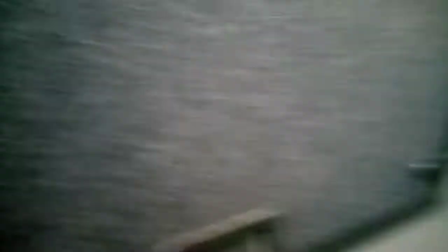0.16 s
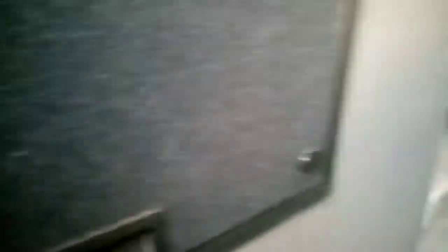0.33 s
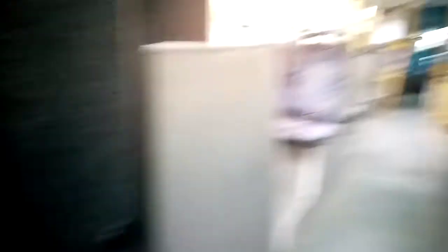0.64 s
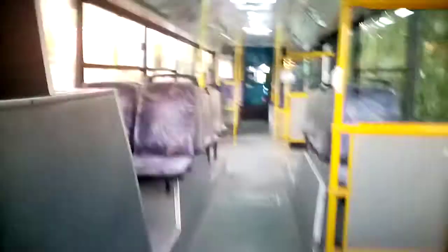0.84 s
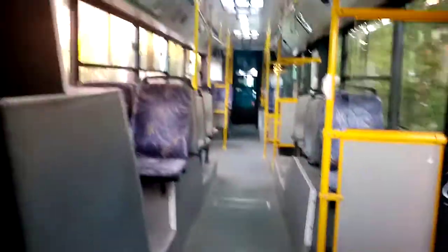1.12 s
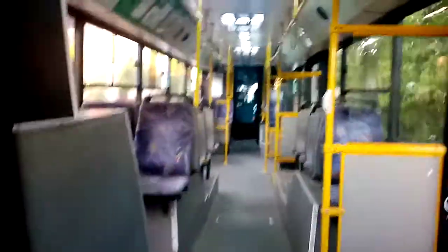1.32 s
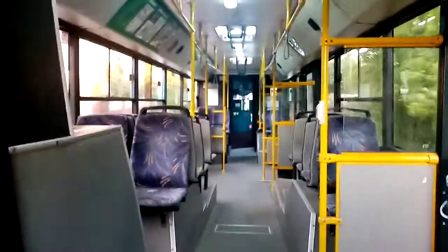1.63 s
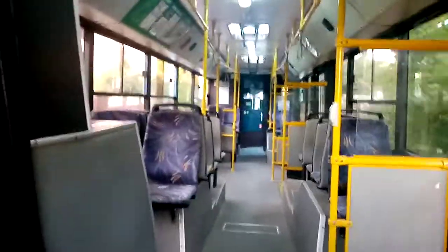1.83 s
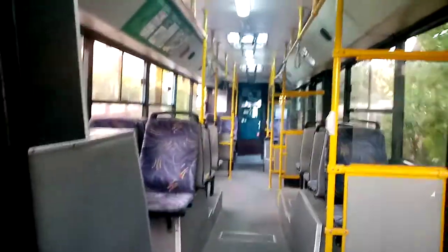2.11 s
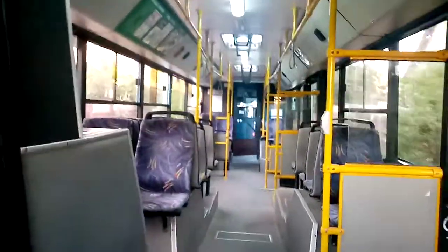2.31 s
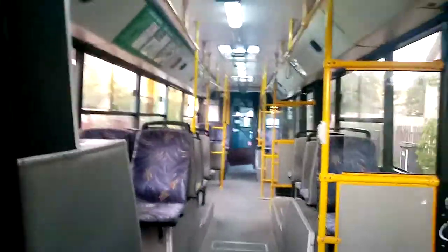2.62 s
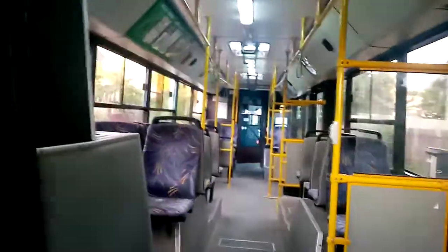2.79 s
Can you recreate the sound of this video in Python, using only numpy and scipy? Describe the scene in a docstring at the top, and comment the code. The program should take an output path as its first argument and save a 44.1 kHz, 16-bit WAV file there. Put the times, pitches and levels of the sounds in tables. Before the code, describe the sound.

A moving city bus engine hums continuously over a wavering driveline drone, cabin boom and broadband tyre roar. Handling swishes, small clicks, dull bumps and briefly singing panels mark the first 0.6 s. As the handheld microphone turns, airy noise swells near 1.1 s and fades by 1.5 s. The engine slows slightly and throbs more strongly; faint panel chatter and dry rattles continue to about 2.7 s, with soft road thuds near 2.6-2.8 s.

```python
"""Inside a moving city bus, heard from the back seats.
From the start an engine hums and throbs, slowing slightly, over the surging tones of the drive shaft; the
cabin booms, panels ring, tyres roar and air hisses, with swishes and clicks of a hand-held device and road bumps.
The device turns from wall to aisle, rebalancing tones and resonances; during the turn a rush of air swells and
dies away; panel chatter and short rattles begin during it and go on after. Shafts are sines, the rest mostly noise."""
import sys
import numpy as np
from scipy import signal
from scipy.fft import rfft, irfft
from scipy.io import wavfile
from scipy.ndimage import uniform_filter1d

SR = 44100
rng = np.random.default_rng(int(sys.argv[2]) if len(sys.argv) > 2 else 0)


def wav_out(sig):
    """Save sig, one row per channel (or a flat mono array), as 16-bit PCM at SR to the path in sys.argv[1]."""
    wavfile.write(sys.argv[1], SR, np.round(np.clip(np.atleast_2d(sig).T, -1, 1) * 32767).astype(np.int16))


N = 130095
T, HZ = np.arange(N) / SR, np.fft.rfftfreq(N, 1 / SR)

# Crankshaft speed: t/s, speed/(turns per s)
CRANK_SPEED = [(0, 35.15), (.3, 35.0), (.65, 35.35), (1.05, 34.72), (1.35, 34.4), (1.6, 33.95),
               (1.9, 33.65), (2.25, 33.65), (2.95, 33.85)]
# Drive shaft speed: t/s, speed/(turns per s)
SHAFT_SPEED = [(0, 49.25), (.8, 49.33), (1.5, 49.58), (2.2, 49.83), (2.95, 49.95)]
# Multiples of crank speed in the engine hum: order/1
CRANK_ORDERS = [12, 21, 24, 30]
# Engine hum, one row per order: level facing wall/dB, level facing aisle/dB
CRANK_FACING = [(-33, -33.5), (-47, -39.5), (-44.5, -41.5), (-42.5, -44)]
# Multiples of shaft speed in the shaft hum: order/1
SHAFT_ORDERS = [1, 2, 3, 10, 11, 12, 24]
# Shaft hum, one row per order: level facing wall/dB, level facing aisle/dB
SHAFT_FACING = [(-28.5, -52), (-32.5, -51), (-36.5, -42.5), (-36, -34), (-37, -35.5), (-46.5, -52.5),
                (-38, -65)]
# Engine throb: t/s, level/dB
THROB_LEVEL = [(0, -32), (1.05, -33), (1.2, -26.5), (1.6, -23.5), (2.95, -22.7)]
# Drive shaft drone: t/s, level/dB
DRONE_LEVEL = [(0, -33.5), (.12, -24), (.3, -25), (.45, -26), (.7, -29.5), (.95, -23), (1.06, -26.5),
               (1.2, -23.5), (1.35, -28.5), (1.55, -21), (1.7, -28), (1.82, -23.5), (2.02, -23),
               (2.17, -22.5), (2.4, -24), (2.52, -25), (2.8, -20), (2.95, -28)]
# Passing engine tones: multiple of crank speed/1
SWELL_ORDERS = [24, 24, 19, 19, 12]
# Passing engine tones, one row per order: peak t/s, mean level/dB, half length/s
SWELLS = [(.2, -34, .15), (.55, -39, .15), (.62, -32.5, .28), (1.08, -26.5, .17), (1.5, -24.5, .2)]
# Cabin boom before BOOM_GAIN_DB: t/s, level/dB
BOOM_LEVEL = [(0, -33), (.04, -23), (.12, -30.5), (.19, -30), (.24, -37), (.44, -26), (.76, -39),
              (.81, -28), (1.01, -33), (1.21, -27.5), (1.46, -39.5), (1.54, -24.5), (1.73, -35),
              (1.83, -23), (1.98, -30.5), (2.09, -23), (2.2, -25), (2.3, -39), (2.45, -23), (2.7, -33),
              (2.86, -26), (2.93, -28)]
# Cabin and panel resonances: f/Hz, width/Hz, level facing wall/dB, level facing aisle/dB
RESONANCES = [(56, 20, -31, -28.5), (136, 42, -29, -37.5), (174, 220, -26, -48.5), (188, 15, -35.5, -33.5),
              (1118, 12, -54, -46), (1767, 20, -68, -49.5), (3200, 230, -59, -41.5), (3955, 240, -66, -39)]
# Briefly singing panels: start/s, end/s, f/Hz, width/Hz, level/dB, fade/s
SINGS = [(-.1, .22, 1181, 14, -31, .07), (-.1, .24, 1222, 45, -35, .05), (.12, .25, 2505, 30, -39.5, .15),
         (-.1, .48, 189, 8, -25.5, .15), (.35, .75, 1109, 6, -40, .15)]
# Tyre and road spectrum before ROAD_LEVEL: f/Hz, density/(dB per Hz)
ROAD_SPECTRUM = [(20, -70), (32, -70.5), (45, -45), (65, -46.5), (110, -51), (160, -51.5), (250, -51),
                 (350, -50.5), (500, -50.5), (700, -57), (1100, -59), (1600, -66.5), (2200, -66.5),
                 (3400, -67), (4800, -69.5), (6300, -71), (7000, -79), (8200, -104), (16000, -116)]
# Road gain: t/s, level/dB
ROAD_LEVEL = [(0, -2.5), (.6, 2), (1.3, 1), (1.7, 0.5), (2.1, 1.5), (2.3, 0.5), (2.47, 1), (2.95, 0.5)]
# Air spectrum before RUSH_LEVEL: f/Hz, density/(dB per Hz)
RUSH_SPECTRUM = [(200, -42), (450, -59), (800, -55), (1300, -57), (2300, -56.5), (3500, -57.5),
                 (4800, -61.5), (6300, -63.5), (7100, -76), (8200, -92.5), (16000, -115)]
# Air gain: t/s, level/dB
RUSH_LEVEL = [(0, -5), (.3, -8.5), (.47, -10), (.65, -6.5), (.83, -8.5), (.885, -1.5), (.97, -7),
              (1.04, -3), (1.08, 1), (1.12, -2.5), (1.17, -5.5), (1.27, -8.5), (1.37, -14.5), (1.48, -29),
              (1.53, -6), (1.62, -22.5), (2.95, -20)]
# Hand swish spectrum before SWISH_LEVEL: f/Hz, density/(dB per Hz)
SWISH_SPECTRUM = [(2000, -81.5), (6500, -62), (8200, -79), (11000, -84), (13500, -87.5), (16000, -83)]
# Swish gain: t/s, level/dB
SWISH_LEVEL = [(0, -5.5), (.08, -20), (.2, -8), (.25, -14), (.34, -5), (.42, -16), (.54, -12), (.565, 1.5),
               (.63, -17), (.72, -2.5), (.8, -6), (.95, -7.5), (1.1, -10.5), (1.2, -22), (1.4, -45),
               (2.95, -41.5)]
# Likeness of noise at the two microphones: f/Hz, likeness/(0-1)
LIKENESS = [(60, 0.94), (300, 0.95), (520, 0.91), (700, 0), (1200, 0.14), (3000, 0.13), (8000, 0)]
# Handling clicks: t/s, gain/dB
CLICKS = [(0.1623, -32.5), (0.293, -33.5), (.554, -49)]
# Click spectrum shape: f/Hz, gain/dB
CLICK_COLOUR = [(1000, -9), (5000, 10.5), (7000, 2), (9000, -12), (13000, 2), (16000, -7)]
# Road bumps: t/s, gain/dB, f/Hz
BUMPS = [(.012, -20, 95), (.166, -14, 70), (.335, -24, 50), (.58, -23, 50), (2.58, -19.5, 57),
         (2.65, -21, 57), (2.79, -21, 57)]
# Panel chatter bursts: peak t/s, level/dB, half length/s
SHAKES = [(.672, -37, .018), (1.085, -31, .025), (1.26, -35, .035), (1.545, -37, .035), (2.42, -39, .04),
          (2.53, -39, .03)]
# Loose panel modes: f/Hz, width/Hz, gain/dB
PANEL_MODES = [(1480, 130, -2), (1900, 220, 3.5), (2380, 230, 2), (3100, 350, -6.5), (3930, 450, -8)]
# Rattles: t/s, gain/dB, decay/s, treble tilt at RATTLE_TOP_HZ/dB
RATTLES = [(1.255, -38, 0.014, -9), (1.387, -41, 0.009, 9), (1.49, -25, 0.0032, -7),
           (1.802, -35.5, 0.013, -0.5), (1.9975, -24, 0.0024, 1), (2.385, -39, 0.052, -2),
           (2.50, -43, 0.042, -7.5), (2.65, -43, .015, -2)]
# Rattle spectrum shape before tilt: f/Hz, gain/dB
RATTLE_COLOUR = [(800, -8), (3000, -4), (6800, 11.5), (8500, -12.5), (11000, -9.5), (13000, -22.5),
                 (16000, -19)]
# Left microphone response, dull: f/Hz, gain/dB
LEFT_MIC = [(35, -5.5), (90, -1), (200, -0.57), (600, -1.63), (1300, 0), (2000, -5), (3000, -10),
            (4000, -13.5), (5000, -19), (6300, -26.5), (8000, -31.5), (15000, -27)]
# Right microphone delay: f/Hz, lag/s
RIGHT_LAG = [(50, .00075), (100, .0009), (600, .0009), (1500, .00118)]

TURN_S = (0.44, 1.5)  # start and end of the turn from wall to aisle
WAVER_DB, WAVER_HZ, WAVER_RAD = 1.37, 6.1, .2
THROB_HZ, THROB_WIDTH_HZ, THROB_SPREAD_DB, THROB_JITTER_S = 208, 18, 1.8, .0004
DRONE_ORDER, DRONE_RAD = 6, 0.69
SWELL_WAVER_DB, SWELL_WAVER_HZ = 1.5, 14
BOOM_HZ, BOOM_DRIFT_RAD, BOOM_DRIFT_HZ, BOOM_GAIN_DB = 92.2, 0.27, 4.3, 3.5
SING_RISE_S = 0.018
PATCH_DB, FLUTTER_DB, FLUTTER_HZ = 0.9, .85, 38
CLICK_DECAY_S, CLICK_TAIL_DB, CLICK_TAIL_S = 0.0035, 1, 0.011
CASE_HZ, CASE_WIDTH_HZ, CASE_DB, CASE_RISE_S = 6500, 1300, 7.5, 0.003
BUMP_RISE_S = 0.016
TAPS_PER_S, TAP_SPREAD_DB, PANEL_TOP_HZ = 490, 3.5, 5000
RATTLE_RISE_S, RATTLE_TAIL_DB, RATTLE_TAIL_S, RATTLE_TOP_HZ = .001, -14.5, 0.019, 14000
RIGHT_DB = -8.5
PORT_HZ, PORT_WIDTH_HZ, PORT_DB = 15000, 650, 13
LOW_CUT_HZ, EDGE_HZ = 45, 15750


def amp(db):
    """Decibels to gain."""
    return 10 ** (np.asarray(db) / 20)


def unit(x):
    """Scales to rms 1."""
    return x / np.sqrt(np.mean(abs(x) ** 2) + 1e-20)


def curve(points):
    """Interpolates a control over time."""
    return np.interp(T, *np.transpose(points))


def read(points, hz):
    """Reads a table on a log-frequency axis."""
    f, value = np.transpose(points)
    return np.interp(np.log(hz + 1), np.log(f), value)


def colour(x, gain):
    """Filters by a gain per frequency."""
    return irfft(rfft(x) * gain, N)


def noise(channels=2):
    """White noise, one row per channel."""
    return rng.standard_normal((channels, N))


def drift(hz):
    """Slow random motion of rms 1, rolled off above hz."""
    return unit(colour(noise(1)[0], (HZ > 0) / (1 + (HZ / hz) ** 4)))


def ring(hz, width_hz):
    """Noise in one resonance, rms 1."""
    return unit(colour(noise(1)[0], 1 / (1 + ((HZ - hz) / (width_hz / 2)) ** 2)))


def facing(wall_db, aisle_db):
    """Gain that changes as the hand-held device turns."""
    return amp(np.interp(T, TURN_S, [wall_db, aisle_db]))


def swell(peak_s, half_s):
    """Smooth rise and fall around a moment."""
    return np.exp(-((T - peak_s) / half_s) ** 2)


def tone(speed, order, rad):
    """One multiple of a turning shaft, rms 1, with an unsteady phase."""
    turns = order * np.cumsum(curve(speed)) / SR + rng.random()
    return np.sqrt(2) * np.sin(2 * np.pi * turns + rad * drift(WAVER_HZ))


def hum(speed, orders, levels):
    """Multiples of a turning shaft, each wavering in level."""
    out = np.zeros(N)
    for order, (wall_db, aisle_db) in zip(orders, levels):
        waver = amp(WAVER_DB * drift(WAVER_HZ))
        out += tone(speed, order, WAVER_RAD) * facing(wall_db, aisle_db) * waver
    return out


def wash(spectrum):
    """Two-channel noise with drifting patches, alike in the bass and diffuse above."""
    hz, _, (a, b) = signal.stft(noise(), SR, nperseg=1024, noverlap=768)
    same = np.clip(read(LIKENESS, hz), 0, 1)[:, None]
    patches = uniform_filter1d(rng.standard_normal(a.shape), size=14, axis=0)  # over frequency
    patches = unit(uniform_filter1d(patches, size=10, axis=1))  # over time
    pair = np.array([a, same * a + np.sqrt(1 - same ** 2) * b]) * amp(PATCH_DB * patches)
    patchy = unit(signal.istft(pair, nperseg=1024, noverlap=768)[1][:, :N])
    shaped = colour(patchy, amp(read(spectrum, HZ)) * np.sqrt(SR / 2))  # density per Hz
    return shaped * amp(FLUTTER_DB * drift(FLUTTER_HZ))


def engine_hum():
    """Crankshaft harmonics follow the engine speed."""
    return hum(CRANK_SPEED, CRANK_ORDERS, CRANK_FACING)


def throb():
    """One uneven pulse per two crank turns excites a low body resonance."""
    speed = curve(CRANK_SPEED)
    turns = np.cumsum(speed) / SR + speed * THROB_JITTER_S * drift(WAVER_HZ)
    cycle = np.floor(turns / 2)
    pulses = np.diff(cycle, prepend=0) * amp(THROB_SPREAD_DB * rng.standard_normal(N))
    body = np.exp(-((HZ - THROB_HZ) / THROB_WIDTH_HZ) ** 2)
    return unit(colour(pulses, body)) * amp(curve(THROB_LEVEL))


def engine_swells():
    """Single crank harmonics swell and fade at the changing engine speed."""
    out = np.zeros(N)
    for order, (peak_s, db, half_s) in zip(SWELL_ORDERS, SWELLS):
        level = amp(db + SWELL_WAVER_DB * drift(SWELL_WAVER_HZ))
        out += tone(CRANK_SPEED, order, WAVER_RAD) * level * swell(peak_s, half_s)
    return out


def shaft():
    """Drive shaft harmonics, with one surging, phase-unsteady drone."""
    drone = tone(SHAFT_SPEED, DRONE_ORDER, DRONE_RAD) * amp(curve(DRONE_LEVEL))
    return hum(SHAFT_SPEED, SHAFT_ORDERS, SHAFT_FACING) + drone


def boom():
    """The cabin air booms as one low tone of drifting phase and surging level."""
    phase = 2 * np.pi * (BOOM_HZ * T + rng.random()) + BOOM_DRIFT_RAD * drift(BOOM_DRIFT_HZ)
    return np.sqrt(2) * np.sin(phase) * amp(curve(BOOM_LEVEL) + BOOM_GAIN_DB)


def resonances():
    """Cabin and panel resonances stirred by the road, as resonant noise bands."""
    return sum(ring(hz, width_hz) * facing(wall_db, aisle_db)
               for hz, width_hz, wall_db, aisle_db in RESONANCES)


def singing_panels():
    """Panels sing for a moment: tones of wandering pitch that fade exponentially."""
    out = np.zeros(N)
    for start, end, hz, width_hz, db, fade_s in SINGS:
        rise = (1 + np.tanh((T - start) / SING_RISE_S)) / 2
        fall = np.exp(-np.maximum(T - end, 0) / fade_s)
        turns = np.cumsum(hz + width_hz / 2 * drift(width_hz)) / SR
        out += amp(db) * rise * fall * np.sqrt(2) * np.sin(2 * np.pi * turns)
    return out


def road():
    """Tyre and road roar: broadband noise of slowly changing level."""
    return wash(ROAD_SPECTRUM) * amp(curve(ROAD_LEVEL))


def air():
    """Rushing air: broadband noise, there from the start, that swells and dies away during the turn."""
    return wash(RUSH_SPECTRUM) * amp(curve(RUSH_LEVEL))


def swish():
    """The hand rubs over the device: treble noise in strokes."""
    return wash(SWISH_SPECTRUM) * amp(curve(SWISH_LEVEL))


def clicks():
    """Handling clicks: a two-stage decaying crack and a brief ring of the case."""
    out = np.zeros((2, N))
    crack = unit(colour(noise(), amp(read(CLICK_COLOUR, HZ))))
    case = ring(CASE_HZ, CASE_WIDTH_HZ) * amp(CASE_DB)
    for start, db in CLICKS:
        age = np.maximum(T - start, 0)
        fall = np.exp(-age / CLICK_DECAY_S) + amp(CLICK_TAIL_DB) * np.exp(-age / CLICK_TAIL_S)
        u = age / CASE_RISE_S
        out += amp(db) * (T > start) * (crack * fall + case * (u * np.exp(1 - u)) ** 2)
    return out


def bumps():
    """Wheels cross uneven road: the body swings in a short, dull thud."""
    out = np.zeros(N)
    for start, db, hz in BUMPS:
        age = np.maximum(T - start, 0)
        u = age / BUMP_RISE_S
        out += amp(db) * u * np.exp(1 - u) * np.sin(2 * np.pi * hz * age)
    return out


def shakes():
    """A loose panel chatters: clumps of small random taps ring its modes."""
    hits = rng.random((2, N)) < TAPS_PER_S / SR
    signs = rng.choice([-1, 1], (2, N))
    taps = hits * signs * amp(TAP_SPREAD_DB * noise())
    modes = sum(amp(db) / (1 + 2j * (HZ - hz) / width_hz) for hz, width_hz, db in PANEL_MODES)
    damping = 1 / (1 + (HZ / PANEL_TOP_HZ) ** 8)
    bursts = sum(amp(db) * swell(peak_s, half_s) for peak_s, db, half_s in SHAKES)
    return unit(colour(taps, modes * damping)) * bursts


def rattles():
    """Loose fittings tick: shaped noise bursts with a second, weaker decay."""
    out = np.zeros((2, N))
    for start, db, decay_s, top_db in RATTLES:
        age = np.maximum(T - start, 0)
        rise = np.minimum(age / RATTLE_RISE_S, 1)
        fall = np.exp(-age / decay_s) + amp(RATTLE_TAIL_DB) * np.exp(-age / RATTLE_TAIL_S)
        tilt_db = top_db * np.minimum(HZ / RATTLE_TOP_HZ, 1) ** 4
        tick = unit(colour(noise(), amp(read(RATTLE_COLOUR, HZ) + tilt_db)))
        out += amp(db) * rise * fall * tick
    return out


def scene():
    """Sums engine, drive shaft, cabin, road, air and small noises."""
    engine = engine_hum() + throb() + engine_swells()
    cabin = boom() + resonances() + singing_panels()
    knocks = clicks() + bumps() + shakes() + rattles()
    return engine + shaft() + cabin + road() + air() + swish() + knocks


def record(dry):
    """Two unlike microphones with a port resonance and a low cut, then the band limit."""
    left = amp(read(LEFT_MIC, HZ))
    right = amp(RIGHT_DB) * np.exp(-2j * np.pi * HZ * read(RIGHT_LAG, HZ))
    port = amp(PORT_DB * np.exp(-((HZ - PORT_HZ) / PORT_WIDTH_HZ) ** 2))
    low_cut = 1 / np.sqrt(1 + (LOW_CUT_HZ / (HZ + 1)) ** 8)
    heard = colour(dry, np.array([left, right]) * port * low_cut)
    band_limit = signal.firwin(511, EDGE_HZ, window=("kaiser", 9), fs=SR)
    return signal.oaconvolve(heard, band_limit[None], "same")


dry = scene()
out = record(dry)
wav_out(out)
```